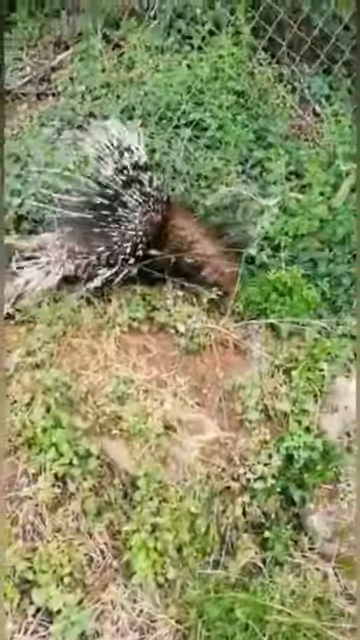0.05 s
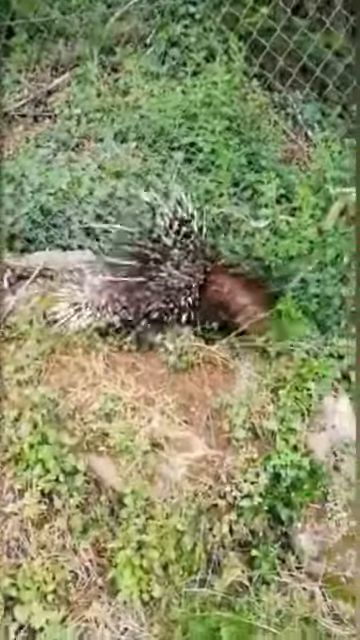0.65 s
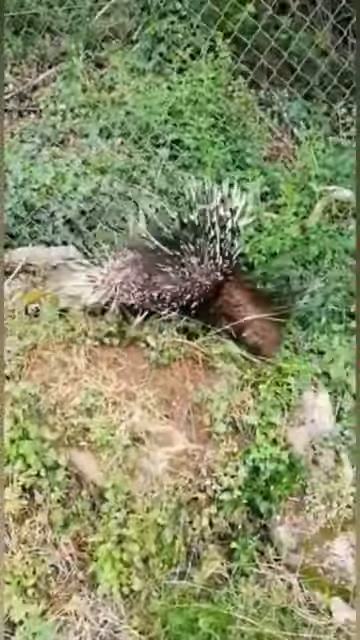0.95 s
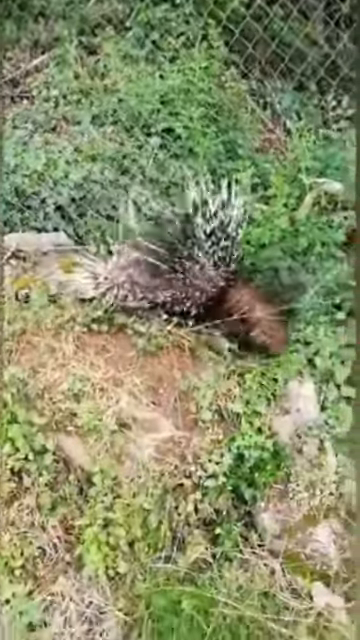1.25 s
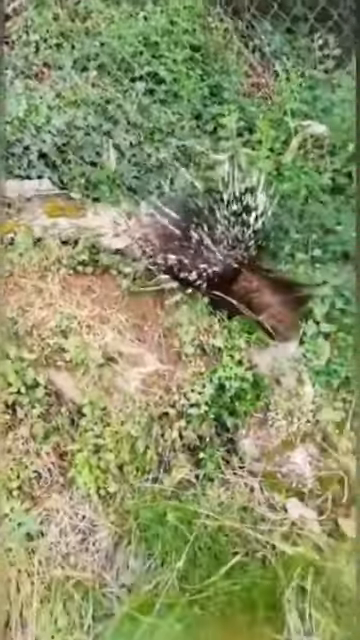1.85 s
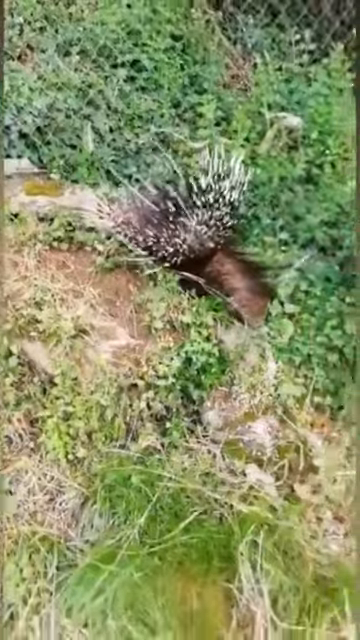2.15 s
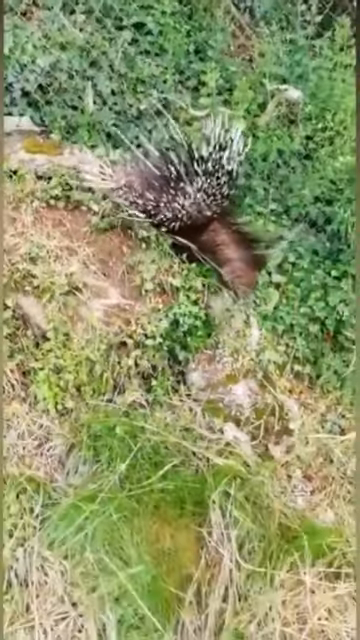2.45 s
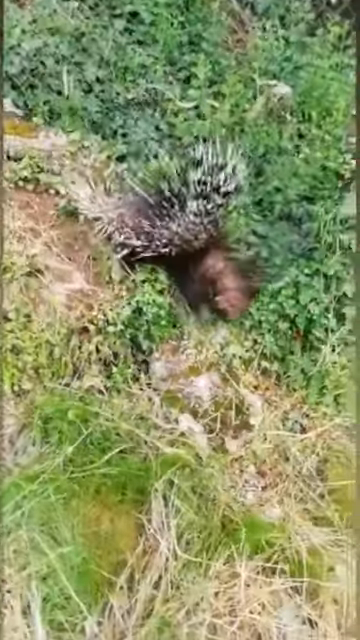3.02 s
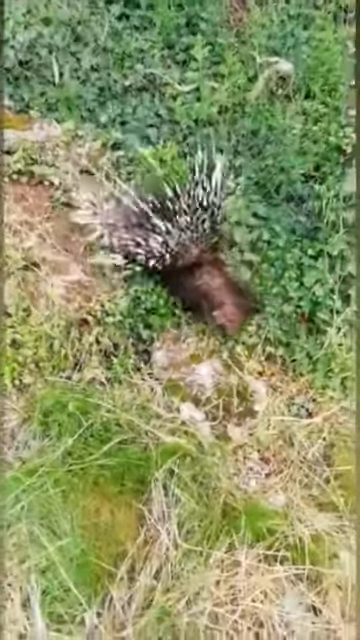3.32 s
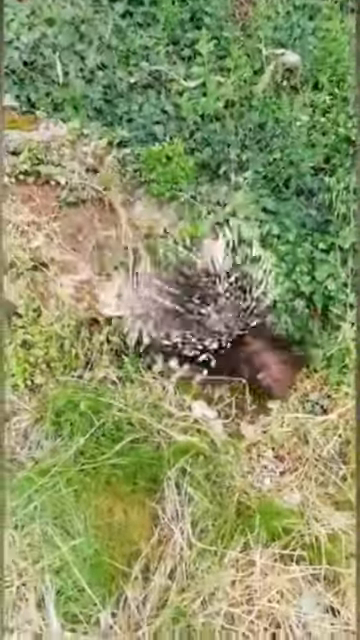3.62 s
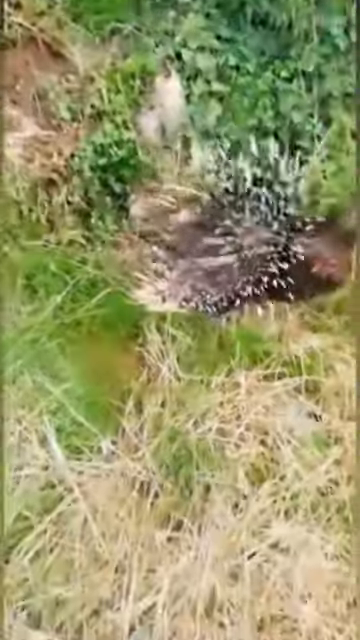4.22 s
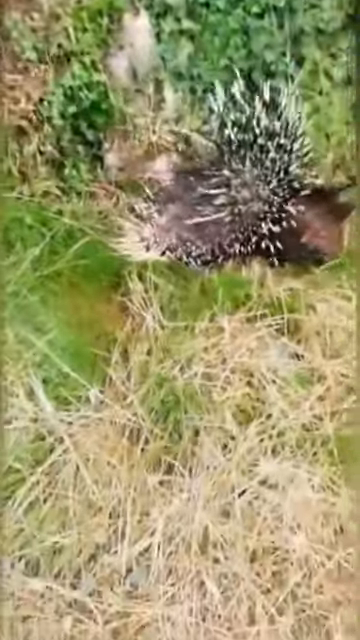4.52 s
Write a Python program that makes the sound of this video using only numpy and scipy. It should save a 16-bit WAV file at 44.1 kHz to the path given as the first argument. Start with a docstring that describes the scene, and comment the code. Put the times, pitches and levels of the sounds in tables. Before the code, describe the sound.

A porcupine trots through dry weeds a few metres away, shaking its quills in a fast, continuous dry rattle with a slightly hollow, woody ring. Under it are soft footfalls, a few knocks, gritty scrapes and some low, hoarse grunts. A songbird whistles briefly three times over a soft outdoor hush. The rattle eases past the middle, then grows loudest near the end as stalks crackle.

```python
"""In dry weeds a few metres away, a porcupine trots along, shaking its raised quills about 25 times a second.
The quills clack together and go on clattering; the hollow tail quills add a woody ring.
Feet thud and knock, claws scrape grit, stalks brush past and the tail drags through dry leaves.
The animal's throat chops air into five grunts. Farther off, a songbird whistles over a soft hush of air."""
import sys
import numpy as np
from scipy import signal
from scipy.fft import rfft, irfft
from scipy.io import wavfile
from scipy.ndimage import uniform_filter1d, map_coordinates

SR = 44100
rng = np.random.default_rng(int(sys.argv[2]) if len(sys.argv) > 2 else 0)


def output_pcm(signal):
    """Save a mono or channel-first signal as 16-bit PCM at the path in sys.argv[1].

    Samples are clipped to [-1, 1] before scaling.
    """
    pcm = np.clip(np.atleast_2d(signal).T, -1, 1) * 32767
    wavfile.write(sys.argv[1], SR, np.round(pcm).astype(np.int16))


N = 201757

# How hard the long back quills are shaken. Each row: time in seconds, level in dB.
SHAKE_EFFORT = [(0, -34.5), (.1, -44.5), (.4, -41.5), (.52, -37.5), (.9, -36), (1.15, -35), (1.5, -36.5),
                (1.93, -34), (2.17, -37.5), (2.62, -40.5), (2.73, -36), (2.95, -39.5), (3.26, -40.5),
                (3.43, -34), (3.86, -31.5), (3.985, -39), (4.09, -31.5), (4.25, -30.5), (4.57, -37.5)]
# Clatter that goes on between shakes. Each row: time in seconds, amount (1 equals a shake's swell).
LOOSENESS = [(0, 0.71), (.5, 1), (.7, 0.15), (.8, 1), (1.6, 1), (2, 0.34), (2.2, 0.066), (2.65, 0.096),
             (2.85, 1), (3.3, .35), (3.8, 1), (3.98, 0.05), (4.2, 0.48), (4.5, 0.079)]
# Footsteps. Each row: start in seconds, thud level in dB, scuff level in dB.
STEPS = [(0.023, -42.5, -49), (0.581, -40, -65), (0.842, -39, -49.0), (0.891, -34, -45),
         (0.923, -31.5, -41), (1.043, -43, -53), (1.103, -44, -40), (1.219, -37, -36), (1.27, -40, -40),
         (1.358, -43, -46), (1.509, -40, -45), (1.789, -35, -42), (1.82, -37.5, -48), (1.943, -42, -40),
         (1.978, -38.5, -52), (2.02, -39, -47), (2.073, -33.5, -53), (2.374, -35, -50), (2.637, -38.5, -53),
         (2.664, -58, -53.5), (2.906, -35, -50), (3.014, -37, -70), (3.043, -45.5, -61.0),
         (3.138, -43.0, -44.5), (3.17, -37, -51), (3.237, -35.5, -41), (3.269, -43.5, -51),
         (3.535, -31, -40.5), (3.566, -40, -46.0), (3.593, -40, -45.0), (3.632, -38.5, -44),
         (3.73, -36, -41), (3.767, -41.0, -49.0), (3.816, -31, -43), (3.853, -33, -38), (3.884, -29, -39),
         (3.989, -33, -52.0), (4.041, -35.5, -49.0), (4.157, -31, -40.5), (4.201, -35.5, -48.0),
         (4.269, -38, -50), (4.345, -39.5, -45), (4.457, -32, -57), (4.497, -41.5, -64)]


def amp(db):
    """Turns decibels into a gain."""
    return 10 ** (np.asarray(db) / 20)


def evened(x):
    """Scales a sound to an average power of 1."""
    return x / np.sqrt(np.mean(x ** 2) + 1e-20)


def at_pitch(points, hz):
    """Looks up a table by frequency, on a logarithmic scale."""
    f, value = np.transpose(points)
    return np.interp(np.log(hz + 1), np.log(f + 1), value)


def at_time(points, s):
    """Looks up a table by time."""
    return np.interp(s, *np.transpose(points))


def curve(points):
    """A table over time, as one value for each sample."""
    return at_time(points, np.arange(N) / SR)


def add(mix, s, sound):
    """Mixes a sound in at s seconds."""
    part = mix[..., max(round(s * SR), 0):][..., :sound.shape[-1]]
    part += sound[..., :part.shape[-1]]


def colour(x, points, size=4096):
    """Filters a sound to give it a tone colour: some frequencies stronger, others weaker."""
    log_gain = np.log(amp(at_pitch(points, abs(np.fft.fftfreq(size, 1 / SR)))))
    ring = np.fft.ifft(np.exp(np.conj(signal.hilbert(log_gain)))).real[:size // 2]  # only after a hit
    return signal.oaconvolve(x, ring[None] / np.linalg.norm(ring), axes=1)[:, :x.shape[1]]


def ticks(at, sizes, ring_s, length, tone=0, size=320):
    """Each collision is a tiny dying burst of noise on two paths; tone adds a quill's brief ring."""
    t = np.arange(size) / SR
    pitch, phase = np.split(rng.random((3, len(at), 1)), [1])
    hz = 1400 * 4.655 ** pitch  # 1400 to about 6500 Hz
    ring = np.sin(2 * np.pi * (hz * t + phase)) * np.exp(-t / (2 * ring_s))
    bursts = rng.standard_normal((2, len(at), size)) * np.exp(-t / ring_s) + tone * ring
    bursts *= 1 - np.exp(-2 * t / ring_s)
    bursts *= sizes[:, None] / np.linalg.norm(bursts, axis=2, keepdims=True)
    where = ((at * SR).astype(int)[:, None] + np.arange(size)).ravel()
    return np.array([np.bincount(where, b.ravel(), length)[:length] for b in bursts])


def patter(count, spread_db, ring_s, tone=0):
    """Random collisions all through the scene; spread_db makes their sizes uneven."""
    when, size = rng.random((2, count))
    at = (np.arange(count) + 3 * when) / count * N / SR
    sizes = amp(spread_db * np.minimum(-np.log(size), 3))
    return evened(ticks(at, sizes, ring_s, N, tone))


def echoes(x, fade_s, first_s, size=22050):
    """The bank and the leaves throw back about 2500 small echoes a second, down 60 dB after fade_s."""
    t = np.arange(size) / SR
    taps = rng.standard_normal((2, size)) * (rng.random((2, size)) < 2500 / SR)
    taps *= (t > first_s) * amp(-60 * t / fade_s)
    return signal.fftconvolve(x, taps / np.linalg.norm(taps, axis=1, keepdims=True), axes=1)[:, :N]


def moving_echoes(x, fade_s=0.064, count=5, cycle_hz=3):
    """The animal moves, so one set of echo paths keeps fading into the next."""
    turn = np.arange(N) / SR * cycle_hz * count
    shares = (np.clip(1 - abs((turn - k + 1) % count - 1), 0, 1) for k in range(count))
    return sum(echoes(x * np.sin(np.pi / 2 * share), fade_s, 0.0026, size=6000) for share in shares)


def distant_air(level_db=-45.5):
    """The steady hush of the outdoors."""
    # Tone of the hush. Each row: frequency in Hz, strength in dB.
    hush_tone = [(15, 12), (28, -1), (77, 3.5), (250, -5.5), (620, -8.5), (1150, -11.5), (1800, -6),
                 (4200, -20), (7700, -20), (15100, -9.5), (15650, -59)]
    return amp(level_db) * evened(colour(rng.standard_normal((2, N)), hush_tone))


def bird(burr_hz=240, level_db=-1, onset_db=-13, end_db=-11, echo_db=-8, left_lag_s=.0001):
    """Each whistle glides along an arc and swells to a peak; most waver roughly, and trees echo them."""
    # Each row: start and length in seconds; first, middle and last pitch in Hz; level in dB;
    # place of the peak in the note and roughness (burr), both from 0 to 1.
    notes = [(0.044, 0.08, 2170, 2077, 1960, -31, 0.14, 0.5),
             (0.135, 0.099, 2080, 2347, 2230, -24, 0.44, 0),
             (0.282, 0.11, 2485, 2650, 2470, -23.5, 0.72, 0.12),
             (0.38, 0.051, 2633, 2660, 2565, -26.5, 0.16, 0.38),
             (0.42, 0.082, 2720, 2960, 3220, -31, 0.1, 0.32),
             (1.57, 0.15, 1886, 2287, 2174, -30, 0.24, 0.61),
             (1.831, 0.016, 2580, 2680, 2760, -22.5, 0.5, 0.2),
             (1.86, 0.0246, 2340, 2650, 2780, -23, 0.35, 0.02),
             (1.892, 0.028, 2560, 2570, 2550, -24, 0.3, 0.05),
             (1.914, 0.045, 2114, 2240, 1950, -25, 0.1, 0.43),
             (1.954, .014, 2000, 2080, 2200, -26, 0.5, 0.1),
             (2.445, .156, 1770, 2248, 2777, -21.5, 0.83, 0.23),
             (2.584, 0.042, 2710, 2793, 2820, -24.5, 0.47, 0.34)]
    song = np.zeros(N)
    for s, length, first_hz, middle_hz, last_hz, db, peak, burr in notes:
        progress = np.linspace(0, 1, int(length * SR))
        hz = np.polyval(np.polyfit([0, .5, 1], [first_hz, middle_hz, last_hz], 2), progress)
        swell = amp(np.interp(progress, [0, peak, 1], [onset_db, 0, end_db]))
        swell *= signal.windows.tukey(len(hz), .15)
        waver = evened(uniform_filter1d(rng.standard_normal(SR // 2), 130))[:len(hz)]
        turns = np.cumsum(hz + burr_hz * burr * waver) / SR
        add(song, s, amp(db + level_db) * swell * np.sqrt(2) * np.sin(2 * np.pi * turns))
    pair = np.array([np.roll(song, round(left_lag_s * SR)), song])
    return pair + amp(echo_db) * echoes(pair, fade_s=0.42, first_s=0.004)


def footfalls(rise_s=0.012, level_db=-1):
    """Each foot thuds on the soil and scuffs the dry leaves lying on it."""
    # Tones of the thud and the scuff. Each row: frequency in Hz, strength in dB.
    thud_tone = [(15, -13), (32, -17), (52, 2.5), (80, -2.5), (130, -2), (190, -9.5), (300, -21),
                 (700, -42), (2000, -31.5)]
    scuff_tone = [(100, -20), (230, -43), (400, 8.5), (510, 15.5), (650, 2), (850, -0.5), (1150, 10),
                  (1600, -46), (3000, -9.5), (8000, -27.5)]
    t, out = np.arange(SR // 6) / SR, np.zeros((2, N))
    push = t / rise_s * np.exp(1 - t / rise_s)
    for s, thud_db, scuff_db in STEPS:
        thud = colour(np.sqrt(push) * rng.standard_normal((2, len(t))), thud_tone)
        scuff = colour(np.sqrt(push) * rng.standard_normal((2, len(t))), scuff_tone)
        step = amp(thud_db) * thud / thud.std(1, keepdims=True) + amp(scuff_db) * evened(scuff)
        add(out, s, amp(level_db) * np.sqrt(np.mean(push)) * step)
    return out


def knocks(fade_s=0.064, rise_s=0.0042):
    """A foot strikes stone or wood, which rings with one hollow, quickly dying note."""
    # Each row: start in seconds, pitch in Hz, level in dB.
    strikes = [(.912, 532, -21), (0.97, 462, -24.5), (1.244, 1163, -21), (4.178, 526, -31)]
    t, out = np.arange(SR // 4) / SR, np.zeros((2, N))
    for s, hz, db in strikes:
        add(out, s, amp(db - 60 * t / fade_s) * (1 - np.exp(-t / rise_s)) * np.sin(2 * np.pi * hz * t))
    return out


def scrapes():
    """Claws catch and slip on grit: a short, coarse crunch."""
    # Each row: start in seconds, length in seconds, level in dB.
    slips = [(0.903, 0.03, -30), (1.18, 0.11, -35), (1.493, 0.066, -39), (2.031, 0.1, -37.5),
             (2.345, 0.049, -39.5), (2.909, 0.085, -42.5), (3.245, 0.066, -39), (3.386, 0.039, -43),
             (3.661, 0.25, -37.5)]
    # Tone of the grit. Each row: frequency in Hz, strength in dB.
    grit_tone = [(100, -0.5), (280, -7), (520, 3), (700, 2), (950, -1.5), (1170, 5), (1600, -2), (2100, -1),
                 (4000, -35)]
    grit = evened(colour(patter(count=2500, spread_db=-2.5, ring_s=0.00029), grit_tone))
    swell = np.zeros(N)
    for s, length, db in slips:
        add(swell, s, amp(db) * signal.windows.tukey(int(length * SR), .4))
    return swell * grit


def grunts(flutter_hz=75, depth=.6):
    """Hoarse grunts: air chopped unevenly by the animal's throat."""
    # Each row: start in seconds, length in seconds, level in dB.
    calls = [(0.74, 0.09, -38.5), (0.805, 0.098, -35.5), (1.046, 0.12, -33.5), (3.702, 0.117, -35.5),
             (4.029, 0.092, -36)]
    # Tone of the throat. Each row: frequency in Hz, strength in dB.
    throat_tone = [(80, -8), (180, -6), (300, -3), (450, 6), (560, -4.5), (700, -12.5), (1200, -19.5),
                   (4000, -33)]
    out = np.zeros((2, N))
    for s, length, db in calls:
        air, jitter = np.split(rng.standard_normal((3, SR // 4))[:, :int(length * SR)], [2])
        turns = np.cumsum(flutter_hz * (1 + 4 * uniform_filter1d(jitter[0], 300))) / SR
        puff = colour(air * (1 + depth * np.cos(2 * np.pi * turns)), throat_tone)
        add(out, s, amp(db) * evened(puff) * signal.windows.tukey(len(turns), .5))
    return out


def stirring(strokes, settle_s, rest, gather_s=0.004):
    """The quills gather just before every shake and settle after it; rest is the motion in between."""
    t, starts = np.arange(N) / SR, np.sort([-np.inf, np.inf] + [row[0] for row in strokes])
    coming = np.searchsorted(starts, t)
    settling = np.exp((starts[coming - 1] - t) / settle_s)
    gathering = np.exp((t - starts[coming]) / gather_s)
    stir = rest + np.maximum(settling, gathering)
    return stir / np.sqrt(uniform_filter1d(stir ** 2, size=3500))


def tail_swing(jolt_db=2.5, lag_s=0.027, width_s=0.031):
    """Level of the tail in dB: its slow swing, and a jolt just after every footfall."""
    # How hard the tail swings. Each row: time in seconds, level in dB.
    swing = [(0, -37.5), (.35, -39), (.55, -45), (.7, -47), (.82, -39.5), (1.05, -38.5), (1.22, -33.5),
             (1.38, -34), (1.62, -41.5), (1.79, -42.5), (1.91, -35), (2.16, -40), (2.4, -42), (2.52, -62),
             (2.72, -63), (2.86, -41.5), (3.25, -52.5), (3.56, -42), (3.68, -50), (4.08, -37.5),
             (4.57, -49)]
    t = np.arange(N) / SR
    jolts = np.array([row[0] for row in STEPS]) + lag_s
    nearest = jolts[np.searchsorted((jolts[1:] + jolts[:-1]) / 2, t)]
    return curve(swing) + jolt_db * np.exp(-((t - nearest) / width_s) ** 2)


def tail_drag(strokes, level_db=-9):
    """The swinging tail drags through dry leaves with a dull rustle that pulses with each shake."""
    # Tone of the leaves. Each row: frequency in Hz, strength in dB.
    leaf_tone = [(80, -26.5), (200, 6.5), (300, 8.5), (500, 1.5), (700, -1), (1100, 0.5), (1500, -14),
                 (3000, -12.5)]
    # How firmly the tail lies in them. Each row: time in seconds, added level in dB.
    pressure = [(0, 1), (.55, -8.5), (.8, -2), (2.3, 3.5), (2.6, -6), (3.2, 4.5), (4.57, 0.5)]
    rustle = patter(count=1500, spread_db=0, ring_s=0.0014) * stirring(strokes, settle_s=0.014, rest=0.3)
    return amp(level_db + tail_swing() + curve(pressure)) * evened(colour(rustle, leaf_tone))


def weeds(strokes, level_db=2, graze_db=-21):
    """Quills brush past dry stalks: a fine crackle that swells with each shake and in each clump."""
    # Tone of the stalks. Each row: frequency in Hz, strength in dB.
    stalk_tone = [(500, -53.5), (2000, 4.5), (6000, 0), (7800, -2), (9200, -2.5), (10100, 2.5),
                  (12500, 4.5), (14000, 0), (15000, 5.5), (15650, -16)]
    # Clumps of stalks. Each row: time of the middle in seconds, length in seconds, level in dB.
    clumps = [(0.333, 0.1, -41), (0.467, 0.31, -46), (1.067, 0.86, -41), (1.447, 0.3, -39),
              (1.71, 0.34, -42.5), (1.884, 0.064, -40), (2.852, 0.26, -37), (2.984, 0.16, -39.5),
              (3.139, 0.18, -45), (3.775, 0.43, -32), (4.182, 0.42, -39)]
    crackle = patter(count=12000, spread_db=0.5, ring_s=0.00088)
    stir = stirring(strokes, settle_s=.018, rest=curve(LOOSENESS))
    power = amp(curve(SHAKE_EFFORT) + graze_db) ** 2  # the quills always graze some weeds
    for s, length, db in clumps:
        add(power, s - length / 2, amp(db) ** 2 * np.hanning(int(length * SR)))
    return amp(level_db) * np.sqrt(power) * evened(colour(crackle * stir, stalk_tone))


def tail_quills(strokes, level_db=2):
    """Open, hollow quills knock together and ring like little tubes."""
    # The tubes' notes. Each row: pitch in Hz, width in Hz, strength in dB.
    tube_notes = [(1310, 1200, -44), (1519, 135, 26), (1792, 140, 23), (2470, 100, -22), (2750, 270, 22.5)]
    taps = patter(count=2200, spread_db=2.8, ring_s=0.00032) * stirring(strokes, settle_s=0.025, rest=1)
    ring = sum(amp(db) * np.sqrt(200 / width) * signal.lfilter(*signal.iirpeak(hz, hz / width, SR), taps)
               for hz, width, db in tube_notes)
    ring = signal.sosfilt(signal.butter(2, [1050, 4000], "band", fs=SR, output="sos"), ring)
    return amp(level_db + tail_swing()) * evened(ring)


def back_quills(strokes, level_db=-0.5, tip_hz=4270, tip_width_hz=1200):
    """Long solid quills slide over each other in a dense, dry rustle; their thin tips ring higher."""
    # Tone of the rustle. Each row: frequency in Hz, strength in dB.
    rustle_tone = [(300, -28), (1000, -10.5), (1500, -16), (2300, -2.5), (2900, -3.5), (3600, -0.5),
                   (4100, 5.5), (4600, 2), (5300, -1.5), (6300, 0), (7000, -1.5), (7800, -25), (10000, -7),
                   (15200, -26), (15700, -62)]
    # How far the tips stand out. Each row: time in seconds, boost or cut in dB.
    tip_boost = [(0, -6), (.9, -1), (1.4, -1.5), (2, -2), (2.5, 2), (3.25, 1), (3.6, -3), (4.1, -4),
                 (4.3, -4.5)]
    clatter = patter(count=6500, spread_db=3, ring_s=0.0009, tone=0.6)
    stir = stirring(strokes, settle_s=.014, rest=curve(LOOSENESS))
    rustle = colour(clatter * stir, rustle_tone)
    tips = signal.lfilter(*signal.iirpeak(tip_hz, tip_hz / tip_width_hz, SR), rustle)
    return amp(level_db + curve(SHAKE_EFFORT)) * evened(rustle + (amp(curve(tip_boost)) - 1) * tips)


def soft_clack(s, db, low_hz=1500, high_hz=4700, treble_db=-7, length_ms=5):
    """Two bunches of quills meet lightly, db above the effort: one row like those of the hard clacks."""
    hz = low_hz * (high_hz / low_hz) ** rng.random()
    return s, at_time(SHAKE_EFFORT, s) + db, treble_db, hz, length_ms


def shakes(above_effort_db=3.5, spread_db=2.5, jitter_s=0.002):
    """Lists one clack for each swing of the quills: soft ones fill the gaps between the hard ones."""
    # Each row: time in seconds, peak level in dB, treble boost or cut in dB, ring in Hz, length in ms.
    hard_clacks = [(0.0345, -34.5, -21, 1780, 2.8), (0.1367, -30.5, -12.0, 2000.0, 2.5),
                   (0.225, -28, 1, 3000, 2.9), (0.2334, -29, -5, 2250, 4.5),
                   (0.2768, -28.5, -9, 3420.0, 3.3), (0.3175, -26.5, -10, 1720.0, 2.8),
                   (0.507, -20.5, -17, 2870, 3.2), (0.5399, -26.5, -13, 3830, 6.5),
                   (0.597, -27, 1, 4300, 2.7), (0.6077, -25.5, 2, 4160.0, 3), (0.635, -23.5, -6.0, 2415, 3),
                   (0.645, -31, -7.0, 4300, 3), (0.7154, -24.5, -14, 3800, 3.1),
                   (0.7938, -22, -18, 3450, 5.3), (0.8417, -26, -17, 4270, 3.3),
                   (0.9349, -22, -20, 3020, 3.5), (0.9718, -24, -5, 3000, 3.9),
                   (1.1191, -22, -8, 2730.0, 3.5), (1.1418, -21.5, -8, 2750, 3.7),
                   (1.1563, -23.5, -13, 2880, 6.3), (1.1985, -22, -17, 1570.0, 6.9),
                   (1.2715, -21, 1, 1680, 3.8), (1.3306, -23, -10, 4480.0, 1.5),
                   (1.3605, -21, -10, 1650, 4.6), (1.4063, -22.5, -4.0, 4500, 4),
                   (1.4518, -26.5, 9, 4010.0, 4.5), (1.4595, -23.5, -8, 2760.0, 4.0),
                   (1.4965, -19.5, 2, 2850, 7), (1.5208, -21.5, -8.0, 4370, 3.3),
                   (1.5418, -21, 12.0, 5400, 0.8), (1.5588, -19, -6, 5160, 2.3),
                   (1.5931, -21.5, -12.0, 2220.0, 1.9), (1.667, -20, -6, 2860.0, 5.4),
                   (1.6932, -24, -9.0, 2900, 2.5), (1.7415, -27, -7, 2694, 2.9),
                   (1.77, -29, -5.0, 4200, 4.1), (1.841, -24.5, -11.0, 4240, 1.3),
                   (1.884, -25.0, -7, 4500, 1.9), (1.904, -23, 6, 1590.0, 4.1),
                   (1.9406, -21.5, -8.0, 5000, 1.8), (1.9726, -23.0, -4, 5960, 2.6),
                   (2.045, -30.5, -6, 4000, 3.3), (2.0876, -23.5, 3, 3950, 2.9),
                   (2.1052, -22.5, -12.0, 3400, 1.6), (2.1273, -32, -4, 3200, 2.7),
                   (2.212, -24.5, 0, 4070.0, 3.2), (2.2193, -28.5, 1, 2770, 1.9),
                   (2.2427, -23, -6, 2700, 1.4), (2.249, -24.5, -2, 4050.0, 3.3),
                   (2.2843, -30, 0, 2950, 1.5), (2.291, -27, 0, 2970.0, 3.6),
                   (2.3163, -28, -10.0, 4160, 1.3), (2.3252, -29, -10.0, 2800, 1.5),
                   (2.3628, -29, 6, 3900, 2.2), (2.3741, -25.5, -3, 4000, 2.6),
                   (2.4174, -26.5, -3, 4270, 4.1), (2.447, -25, 6, 4070.0, 1.7), (2.4587, -26, 3, 1744, 3),
                   (2.6885, -29.5, -11.0, 2510, 4.4), (2.7269, -27, -6, 4400, 2),
                   (2.8181, -26, -6, 2200, 1.9), (3.0826, -27.0, -13, 4020, 3),
                   (3.1525, -26, -9, 3880, 4.2), (3.2328, -33.5, 12, 6000, 4.8),
                   (3.399, -23.0, 6, 4300, 1.9), (3.4428, -26.5, -16.0, 3970, 3.6),
                   (3.4737, -25.5, -2, 6260, 4.5), (3.5281, -20, -5, 3160, 3.8),
                   (3.5618, -19.5, -3, 1930, 5), (3.5913, -15.0, 1, 3260, 1.53),
                   (3.6059, -22.0, -5, 2730, 4.7), (3.6189, -19.5, 2, 2690.0, 7.3),
                   (3.6535, -25.5, -11.0, 2630.0, 1.8), (3.736, -22, -15, 3370, 3.4),
                   (3.7665, -16, -11, 2890, 7.6), (3.8247, -17, -13, 3200, 3.7),
                   (3.8554, -18.5, -18, 3020, 14), (3.8819, -18, -13, 2950.0, 1.8),
                   (3.9102, -17.5, -8, 2880, 4.7), (3.9396, -16.5, -1, 2760.0, 2.2),
                   (3.969, -14, 0.5, 2910, 2.9), (3.9992, -20, -3, 2795, 6.6),
                   (4.0288, -12.5, -6.5, 3280, 2.1), (4.0655, -23, -7, 3120.0, 2.1),
                   (4.0884, -23.5, -17, 2696, 2.6), (4.1163, -16.0, -7, 6200, 5.6),
                   (4.1496, -25, -4.0, 3100.0, 4.1), (4.1832, -19, 0.0, 4080, 5.6),
                   (4.214, -21.5, 5, 2840.0, 3.9), (4.2192, -17, -1, 2820.0, 1.9),
                   (4.228, -22.5, -8, 2800.0, 4.5), (4.2449, -21, 0.0, 4120, 3.1),
                   (4.2733, -20, -9, 4460.0, 2.4), (4.284, -21.5, -7.0, 2660, 2.4),
                   (4.3196, -20.5, -12.0, 4600, 2.9), (4.3411, -20.5, -8.0, 2834, 1.9),
                   (4.3496, -18, -13, 2930, 2.3), (4.3724, -22, 2, 6100, 3.6),
                   (4.4031, -24.5, 0, 3240, 4.4), (4.415, -24.5, -2, 1680.0, 2.9),
                   (4.4347, -23, 0, 2820.0, 3.4), (4.4697, -19.5, -2, 2820.0, 2.1),
                   (4.5013, -21.5, 1, 4230, 2.2), (4.5096, -26.5, -8.0, 4370.0, 2.5),
                   (4.5391, -22, 0, 3900, 3.6)]
    # Pace of the shaking. Each row: time in seconds, shakes a second.
    pace = [(0, 20), (.5, 21), (.7, 25), (3.1, 27), (3.6, 33), (4.57, 31)]
    hard_times, between = [row[0] for row in hard_clacks] + [N / SR], []
    for start, end in zip(hard_times, hard_times[1:]):
        swings = max(round((end - start) * at_time(pace, start)), 1)
        between += list(np.linspace(start, end, swings + 1)[1:-1])
    soft = [soft_clack(s + jitter_s * late, above_effort_db + spread_db * force)
            for s, (late, force) in zip(between, rng.standard_normal((len(between), 2)))]
    return list(hard_clacks) + soft


def trailing_clacks(strokes, count=2, gap_s=.0115, above_effort_db=3.5):
    """Lists the looser bunches that meet after each shake, if there is time before the next."""
    starts, rows = sorted(row[0] for row in strokes), []
    for start, end, draws in zip(starts, starts[1:], rng.random((len(starts), count))):
        loose_db = 2 * np.log10(at_time(LOOSENESS, start) + 1e-3)
        for k, draw in enumerate(draws, 1):
            row = soft_clack(start + gap_s * (k + (draw - .5) / 2), above_effort_db + k * loose_db)
            if row[0] < end - gap_s / 2:
                rows.append(row)
    return rows


def clacks(strokes, count=22, gap_s=.00075, lead_s=.006, lead_share=0.55, graze_db=-17, linger_s=0.0034):
    """A bunch of quills meets: a few graze first, the rest tumble after, and the hardest-hit one rings."""
    # Tone of a clack. Each row: frequency in Hz, strength in dB.
    clack_tone = [(200, -30), (900, -15), (1450, -4), (1850, -2), (2200, -6), (2950, 0), (3600, -3),
                  (4500, 0), (5400, -5), (6400, -4.5), (7700, -14), (10000, -10.5), (15000, -10.5)]
    ring_width_hz = 480
    treble = signal.butter(2, 7500, "high", fs=SR)
    out = np.zeros((2, N))
    for s, db, treble_db, hz, length_ms in strokes:
        at = gap_s * (np.arange(count) + rng.random(count) / 2)
        late = at - lead_s  # negative before the main blow
        spread_s = length_ms / 1000 * np.where(late < 0, lead_share, 1 - lead_share)
        sizes = np.exp(-abs(late) / spread_s) + amp(graze_db) * np.exp(-abs(late) / linger_s)
        bunch = colour(ticks(at, sizes, ring_s=0.0005, length=1280, tone=.3), clack_tone, size=1024)
        # Blows above -24 dB set so many quills going that one stands out less.
        ring_db = 8 - .7 * max(db + 24, 0)
        bunch = bunch + amp(ring_db) * signal.lfilter(*signal.iirpeak(hz, hz / ring_width_hz, SR), bunch)
        bunch = bunch + (amp(treble_db) - 1) * signal.filtfilt(*treble, bunch)
        peak_power = uniform_filter1d(bunch ** 2, size=88).max(1, keepdims=True)  # the loudest 2 ms
        add(out, s - lead_s, amp(db) * bunch / np.sqrt(peak_power))
    return out


def microphones(x):
    """Two microphones share the bass; the right one is shaded and hears the animal later."""
    # Each row: frequency in Hz, how much louder the left side is in dB.
    left_boost = [(100, -1), (500, 1.5), (1500, 3), (2200, 4), (3000, 8.5), (4500, 11), (6200, 9),
                  (7800, 14), (10000, 6), (13000, 7), (15000, 11)]
    # Each row: frequency in Hz, how alike the two sides are from 0 to 1.
    likeness = [(60, 1), (250, 0.84), (600, 0), (1200, 0.38), (2200, 0), (3000, 0.73), (6000, 0),
                (8000, 0.07), (15000, 0.1)]
    # Each row: time in seconds, delay on the right in ms, which changes as the animal moves.
    right_delay = [(1.2, 0.14), (2.7, 0.24), (3.7, 0.18)]
    hz = np.fft.rfftfreq(N, 1 / SR)
    near, other = rfft(x)
    same, boost = at_pitch(likeness, hz), amp(at_pitch(left_boost, hz))
    far = same * near + np.sqrt(1 - same ** 2) * other
    left, right = irfft(np.array([near * boost, far]) * np.sqrt(2 / (1 + boost ** 2)), N)
    delayed = np.arange(N) - curve(right_delay) * SR / 1000
    return np.array([left, map_coordinates(right, [delayed], order=5)])


def scene():
    """Quills and their echoes, the ground under the feet, the grunts, distant air and the bird."""
    strokes = shakes()
    quills = clacks(strokes + trailing_clacks(strokes))
    quills = quills + tail_quills(strokes) + back_quills(strokes) + weeds(strokes)
    ground = footfalls() + knocks() + scrapes() + tail_drag(strokes)
    animal = quills + amp(-6.5) * moving_echoes(quills) + ground + grunts()
    return microphones(animal + distant_air()) + bird()


def record(dry):
    """Cuts the highest treble, above 16000 Hz."""
    return signal.oaconvolve(dry, signal.firwin(255, 16000, window=("kaiser", 9), fs=SR)[None], "same")


dry = scene()
out = record(dry)
output_pcm(out)
```